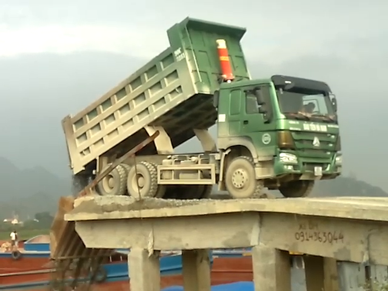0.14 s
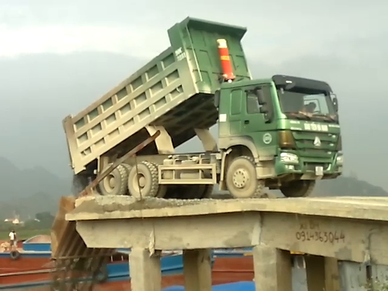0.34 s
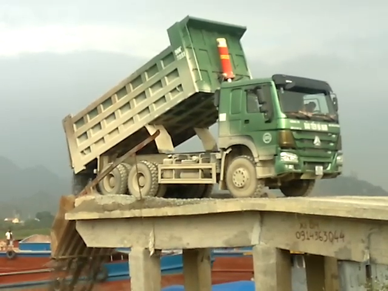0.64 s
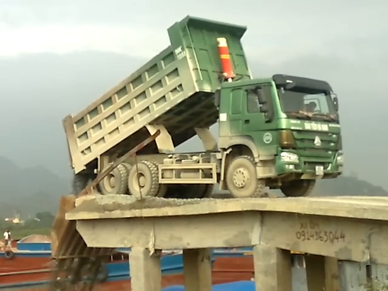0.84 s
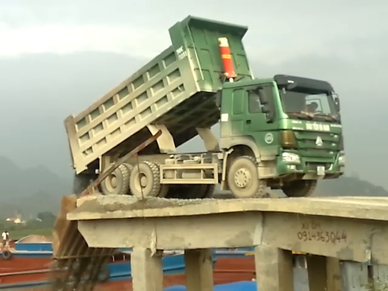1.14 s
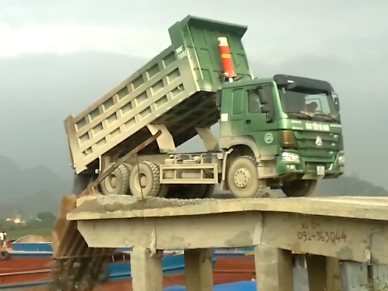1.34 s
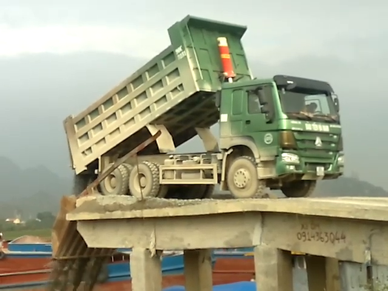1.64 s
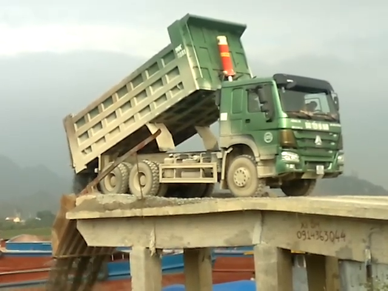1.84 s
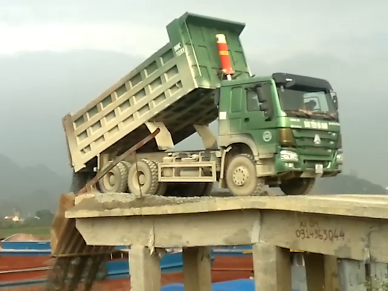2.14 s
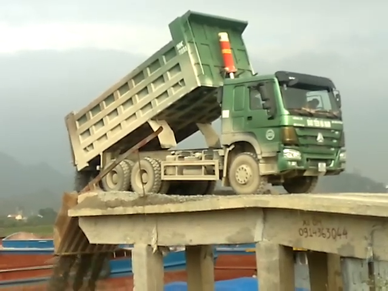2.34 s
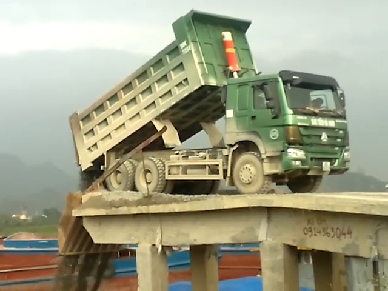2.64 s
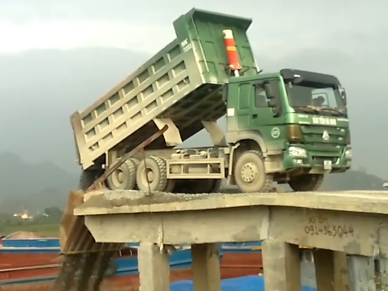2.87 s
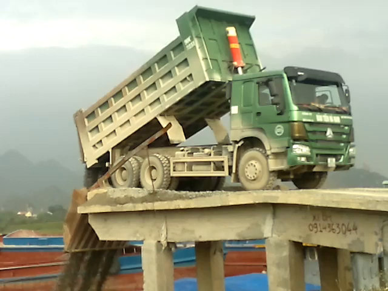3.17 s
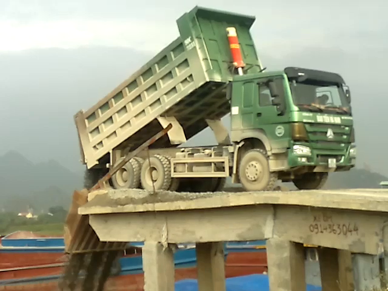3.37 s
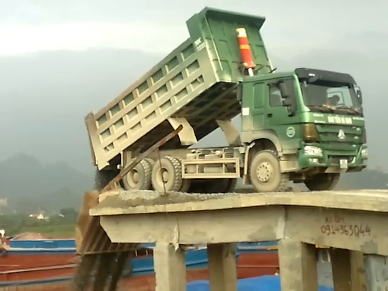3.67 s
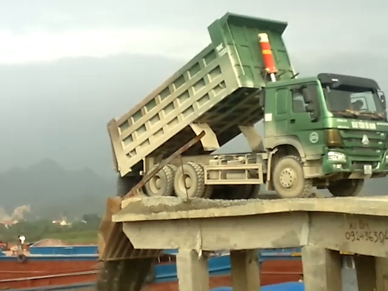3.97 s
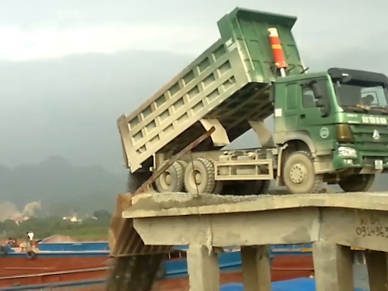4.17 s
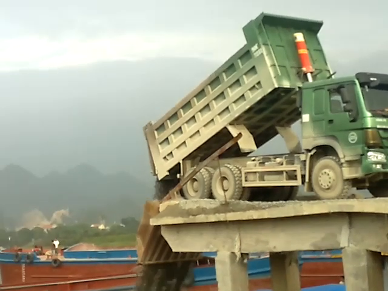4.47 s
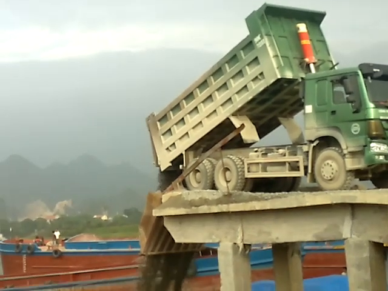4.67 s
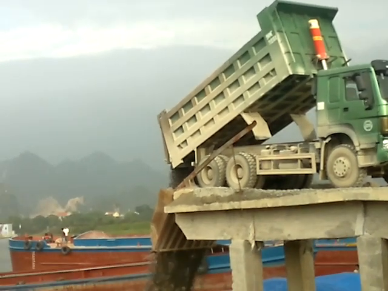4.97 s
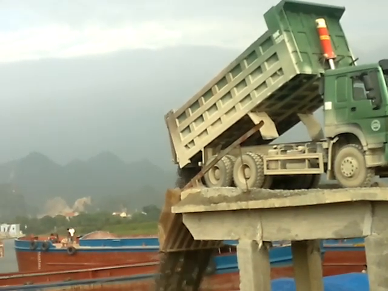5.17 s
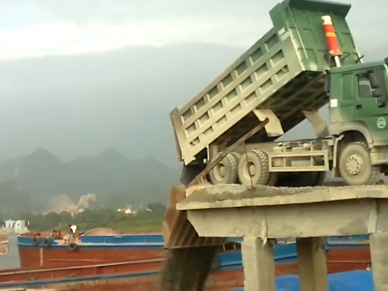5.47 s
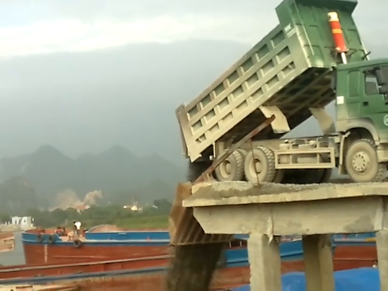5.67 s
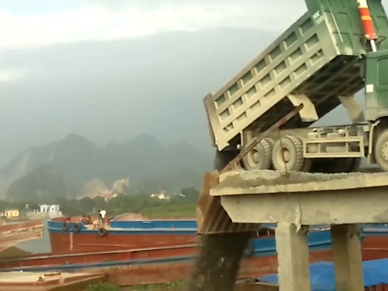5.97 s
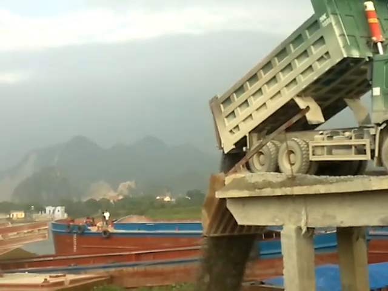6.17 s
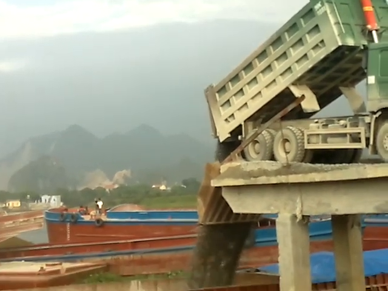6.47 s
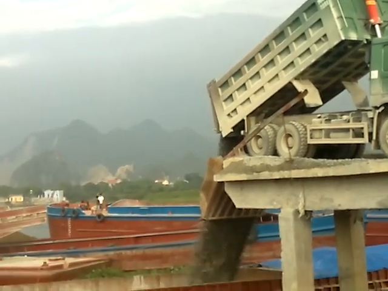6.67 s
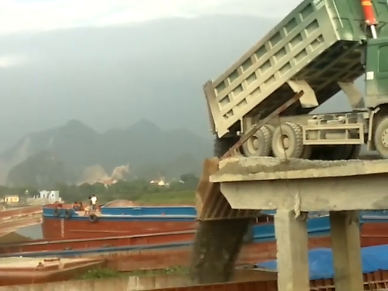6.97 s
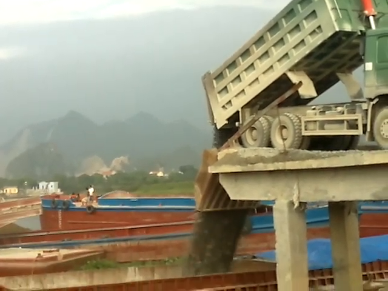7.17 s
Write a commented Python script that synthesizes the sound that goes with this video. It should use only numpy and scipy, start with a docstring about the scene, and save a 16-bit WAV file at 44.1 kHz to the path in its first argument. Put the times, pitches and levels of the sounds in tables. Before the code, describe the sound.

Outdoors at a waterside, some distance off, crushed rock slides from a tipped truck bed down a steel chute into a barge. The dense, bright hiss is already running at the start and never stops, tinged with metallic ringing. Brief clumps clatter through it. Underneath, the loaded hull rumbles and booms softly while a diesel idles low. A single microphone gives a centred mono picture with faint, short reflections.

```python
"""At a waterside, some way off, crushed rock slides off a raised truck bed, down a steel chute and into a barge.
Tens of thousands of random clicks a second merge into a hiss, coloured by stone and ringing chute plates.
Short rushes of clicks clatter as clumps; faint, short echoes comb the hiss and the clatter.
Below, filtered noise and slow tones make the loaded hull rumble and boom, and sines make a diesel idle.
One microphone feeds both channels."""
import sys
import numpy as np
from scipy import signal
from scipy.fft import rfft, irfft
from scipy.io import wavfile
from scipy.ndimage import uniform_filter1d

SR = 44100
rng = np.random.default_rng(int(sys.argv[2]) if len(sys.argv) > 2 else 0)


def persist_wave(psi):
    """Save psi, clipped to +-1, as 16-bit WAV."""
    counts = np.round(np.clip(psi, -1, 1) * 32767).astype(np.int16)
    wavfile.write(sys.argv[1], SR, np.atleast_2d(counts).T)


N = 322806  # length in samples


def gain_of(db):
    """Decibels to a pressure factor."""
    return 10 ** (np.asarray(db) / 20)


def evened(x):
    """Scales to an rms of 1."""
    return x / np.sqrt(np.mean(x ** 2) + 1e-20)


def read(points, hz):
    """Reads a spectrum at hz, joining its points by straight lines on a log frequency axis."""
    f, value = np.transpose(points)
    return np.interp(np.log(hz + 1), np.log(f + 1), value)


def wander(t, slow_hz, fast_hz):
    """Smooth chance: 30 sines of random phase, the slower ones stronger, scaled to rms 1."""
    rates = np.geomspace(slow_hz, fast_hz, num=30)[:, None]
    waves = np.sin(2 * np.pi * (rates * t + rng.random(rates.shape)))
    return evened((waves / np.sqrt(rates)).sum(axis=0))


def resonate(x, hz, width):
    """A resonance of gain 1: shifts hz down to zero, smooths, and shifts back."""
    turn = np.exp(2j * np.pi * np.cumsum(hz * np.ones(len(x))) / SR)
    r = np.exp(-np.pi * width / SR)
    return 2 * (turn * signal.lfilter([1 - r], [1, -r], x / turn)).real


KNOCKS_PER_S = 30000


def knocks(size_db, surge_db):
    """Stone on stone: dense clicks of random sign and size, swelling with surges in the sliding load."""
    size = gain_of(size_db * np.minimum(rng.exponential(1, N), 4)) * rng.uniform(-0.88, 1, N)
    surge = gain_of(surge_db * wander(np.arange(N) / SR, 4, 27))
    struck = rng.random(N) < KNOCKS_PER_S / SR
    return evened(size * struck * surge)


# colour of the knocks, before the chute rings: (f/Hz, level/dB per Hz)
STONE_COLOUR = [(250, -39), (420, -25), (481, -2), (551, -1), (1020, -3), (1170, -1.5), (1820, -2),
                (1990, -3.5), (2180, -1.5), (3040, -2), (3220, 0.5), (4490, -0.5), (7740, -2), (13100, -21),
                (15500, -34)]
# chute plates set ringing by the stones: (f/Hz, width/Hz, early level/dB over the hiss, late level/dB)
CHUTE_PLATES = [(563, 23, 2, 1), (712, 67, 3.5, 2.5), (1176, 230, 1, 2.5), (1490, 110, 3.5, 3),
                (1830, 38, 7, 7.5), (2170, 290, 2, 3.5), (2863, 160, 4, 3.5), (3190, 74, 3, 1.5),
                (3304, 77, 4.5, -2), (3600, 200, 1.5, 0.7), (3980, 55, 4.5, -3), (4400, 430, 3, 3),
                (4970, 310, 0.2, 3.5), (8630, 1400, -0.5, -3.5)]


def stone_and_chute_db(hz, late):
    """Stone colour plus a peak for each ringing plate, blended from its early to its late level."""
    colour_db = read(STONE_COLOUR, hz)[:, None]
    for f, width, early_db, late_db in CHUTE_PLATES:
        peak = 1 / (1 + (2 * (hz - f) / width) ** 2)
        colour_db = colour_db + np.outer(peak, early_db + (late_db - early_db) * late)
    # evened over the body of the hiss, so that the flow alone sets the level there
    band = (hz > 2500) & (hz < 7000)
    return colour_db - 10 * np.log10(np.sum(gain_of(2 * colour_db[band]), axis=0) / len(hz))


def chance_db(hz, t):
    """Random level changes: drifting patches, lurches of the load and single ringing stones."""
    patches = rng.standard_normal((len(hz), len(t)))
    patches = uniform_filter1d(uniform_filter1d(patches, size=24, axis=0), size=12, axis=1)
    # the load slides in lurches, strongest around 4500 Hz
    octaves_away = np.log2((hz[:, None] + 1) / 4500)
    surge = wander(t, 5.5, 20) / (1 + (octaves_away / 2.6) ** 2)
    # here and there one stone rings on its own note
    struck = (rng.random((len(hz), len(t))) < .02) * 1.
    rings = signal.lfilter([1], [1, -.8], uniform_filter1d(struck, size=3, axis=0), axis=1)
    return 0.31 * evened(patches) + 0.29 * surge + 0.89 * evened(rings - rings.mean())


# the pour: (t/s, flow level/dB, treble level/dB per octave above 5500 Hz)
POUR_FLOW = [(0, -18, -3), (.3, -19, -1), (1.2, -18.5, -1), (1.8, -18.1, 0), (2.45, -18.5, .8),
             (3, -17.5, .5), (3.9, -17.5, -1), (4.15, -16, -1.2), (4.35, -17.5, 0.5), (4.7, -17.5, .5),
             (5.2, -17.5, -1), (5.5, -18, 0), (6.1, -18, 3), (6.35, -18.3, 2.5), (6.7, -17.5, 1.6),
             (7.32, -17, 0.3)]
# the ringing of the chute shifts slowly from early to late: (t/s, place from 0 early to 1 late)
LATE_SHIFT = [(0, 0.15), (2.5, 0.013), (4.5, 0.59), (6, 0.72), (7.32, 0.96)]
# low-mids: level early, change late, share of the flow swings they follow, flow they swing around
LOW_MID_DB, LOW_MID_LATE_DB, LOW_MID_FOLLOWS, FLOW_MEAN_DB = -17.5, -1.4, 0.22, -18


def pour():
    """Knocks take the colour of stone and chute; the flow swells mostly in the upper bands."""
    hz, t, spectrum = signal.stft(knocks(size_db=.5, surge_db=-0.1), SR, nperseg=1024, noverlap=768)
    s, flow, treble = np.transpose(POUR_FLOW)
    flow_db, treble_db = np.interp(t, s, flow), np.interp(t, s, treble)
    late = np.interp(t, *np.transpose(LATE_SHIFT))
    octaves_up = np.log2(np.maximum(hz, 5500) / 5500)[:, None]
    low = 1 / (1 + (hz[:, None] / 2600) ** 4)  # share of the low-mid level at each frequency
    low_mid_db = LOW_MID_DB + LOW_MID_LATE_DB * late + LOW_MID_FOLLOWS * (flow_db - FLOW_MEAN_DB)
    level_db = (1 - low) * flow_db + low * low_mid_db + octaves_up * treble_db
    field_db = stone_and_chute_db(hz, late) + level_db + chance_db(hz, t)
    return signal.istft(spectrum * gain_of(field_db), SR, nperseg=1024, noverlap=768)[1][:N]


# reflections off deck, piers and ground: (delay/ms, pressure share at low frequencies)
REFLECTIONS = [(.97, -0.026), (2.05, -0.037), (2.76, -0.027), (5.1, 0.0046)]


def echoes(x):
    """Direct sound plus a few faint, short reflections, which comb the spectrum."""
    hz = np.fft.rfftfreq(N, 1 / SR)
    comb = np.ones(len(hz), complex)
    dull = 1 / (1 + (hz / 6000) ** 2)  # rough surfaces scatter the treble
    for ms, share in REFLECTIONS:
        comb += dull * share * np.exp(-2j * np.pi * hz * ms / 1000)
    return irfft(rfft(x) * comb, N)


# firing rate of the idling engine: (t/s, f/Hz)
IDLE_RATE = [(0, 36.95), (2.5, 36.6), (5, 35.84), (7.32, 36.8)]
# exhaust tones: (multiple of the firing rate, middle level/dB rms)
EXHAUST_ORDERS = [(1, -45.5), (2, -46.5), (4, -52.5), (6, -60)]


def engine():
    """Diesel at idle: sines at multiples of an unsteady firing rate, each wavering in level."""
    t = np.arange(N) / SR
    rate_hz = np.interp(t, *np.transpose(IDLE_RATE)) * (1 + 0.0035 * wander(t, 0.415, 3))
    turns = np.cumsum(rate_hz) / SR
    out = np.zeros(N)
    for multiple, db in EXHAUST_ORDERS:
        level = np.sqrt(2) * gain_of(db + 2.3 * wander(t, 0.96, 5))
        out += level * np.sin(2 * np.pi * (multiple * turns + rng.random()))
    return out


# colour of the rock landing in the hold: (f/Hz, relative level/dB per Hz)
HOLD_RUMBLE = [(9, -36), (18, -16), (28, -5.5), (60, -5.5), (97, -6), (226, -1.5), (281, -3), (324, -9.5),
               (386, -10.5), (421, -9), (480, -8), (620, -37), (1060, -120)]
RUMBLE_DB = -36.5  # middle rms of its part between 90 and 300 Hz


def rumble():
    """Falling rock in the hold: low coloured noise, unsteady in level."""
    hz, t = np.fft.rfftfreq(N, 1 / SR), np.arange(N) / SR
    spectrum = rfft(rng.standard_normal(N)) * gain_of(read(HOLD_RUMBLE, hz))
    body = irfft(spectrum * (hz > 90) * (hz < 300), N)
    return gain_of(RUMBLE_DB + 0.83 * wander(t, 3.2, 12)) * irfft(spectrum, N) / np.std(body)


# hull notes kept humming by the steady fall: (f/Hz, width of each filter pass/Hz, level/dB rms)
HULL_NOTES = [(35, 5.1, -47), (47.7, 9.5, -43.5)]


def hull_hum():
    """Hull resonances: noise passed twice through a narrow filter at each note."""
    out = np.zeros(N)
    for f, width, db in HULL_NOTES:
        once = resonate(rng.standard_normal(N), f, width)
        out += gain_of(db) * evened(resonate(once, f, width))
    return out


# the hull booms under the heaviest loads: (t/s at the loudest, level/dB rms there, f/Hz there)
HULL_BOOMS = [(.03, -37, 51), (.3, -36, 35.7), (.6, -39, 36.6), (.84, -46, 42.7), (1.32, -34, 33.5),
              (1.89, -34, 33), (2.8, -38, 33), (2.92, -36, 45), (3.15, -45, 45), (3.72, -31, 33),
              (4.2, -37, 37), (5.0, -38, 44), (5.2, -39, 45), (5.8, -35, 45.6), (7.05, -40, 35)]
BOOM_RISE_S, BOOM_FADE_S, BOOM_BEND_HZ_PER_S = 0.093, 0.08, 12


def booms():
    """Each boom of the hull is a low tone that swells, fades and climbs slightly in pitch."""
    t, out = np.arange(N) / SR, np.zeros(N)
    for s, db, f in HULL_BOOMS:
        near = slice(max(round((s - .5) * SR), 0), round((s + .5) * SR))
        u = t[near] - s  # seconds from the loudest moment
        swell = np.exp(-(u / np.where(u < 0, BOOM_RISE_S, BOOM_FADE_S)) ** 2)
        turns = f * u + .5 * BOOM_BEND_HZ_PER_S * u ** 2 + rng.random()
        out[near] += np.sqrt(2) * gain_of(db) * swell * np.sin(2 * np.pi * turns)
    return out


# heavier clumps that clatter across the chute: (t/s, level/dB rms before the fade, centre f/Hz)
CHUTE_CLUMPS = [(0.563, -21, 3800), (1.466, -24, 3900), (1.64, -22, 3600), (2.744, -23, 3600),
                (2.804, -16.5, 3500), (4.629, -23, 4000), (5.573, -16.5, 3960), (6.46, -24, 4300),
                (6.715, -20, 4400), (6.949, -21.5, 4500)]
CLUMP_RISE_S, CLUMP_FADE_S = .004, .034


def clumps():
    """Each clump is a short rush of knocks in one broad band, quick to start."""
    out, rush = np.zeros(N), knocks(size_db=-3.0, surge_db=-1.7)
    u = np.arange(round(.12 * SR)) / SR
    shape = np.minimum(u / CLUMP_RISE_S, 1) * np.exp(-(u / CLUMP_FADE_S) ** 2)
    for s, db, hz in CHUTE_CLUMPS:
        at = round(s * SR)
        band = rush[at:at + len(u)]
        for _ in range(4):  # steep skirts: the far clatter has lost its top
            band = resonate(band, hz, width=2800)
        out[at:at + len(u)] += gain_of(db) * evened(band) * shape
    return out


def scene():
    """All sources reach a single microphone, which feeds both channels."""
    rock = echoes(pour() + clumps())
    hold = rumble() + hull_hum() + booms()
    return np.tile(rock + engine() + hold, (2, 1))


def low_pass(x):
    """Removes everything above the highest recorded frequency."""
    return signal.sosfilt(signal.butter(12, 15650, fs=SR, output="sos"), x)


def record(dry):
    """Takes the microphone signal as the finished mix."""
    return low_pass(dry)


dry = scene()
out = record(dry)
persist_wave(out)
```